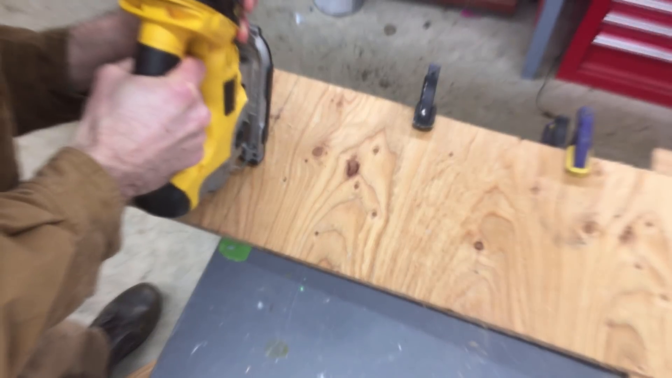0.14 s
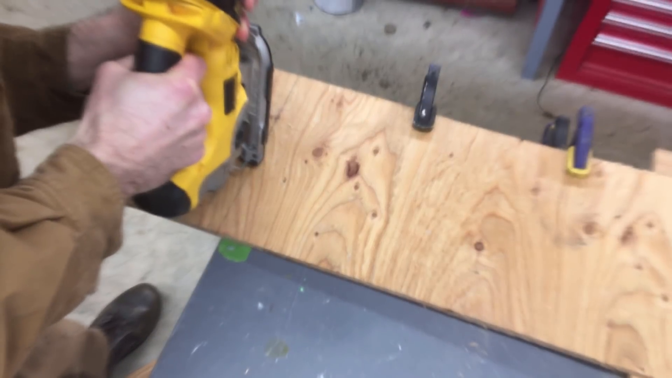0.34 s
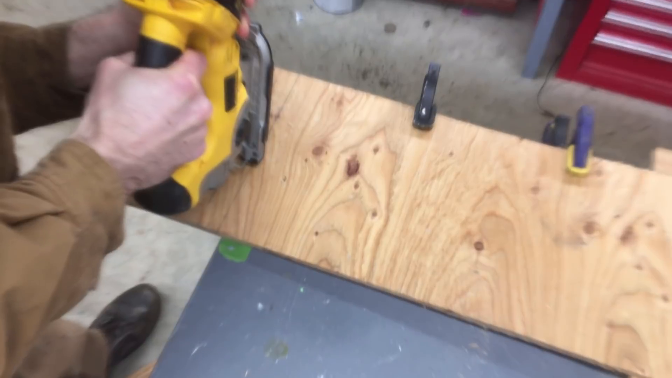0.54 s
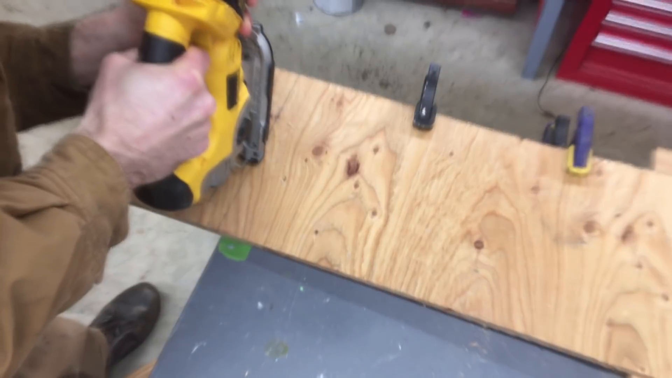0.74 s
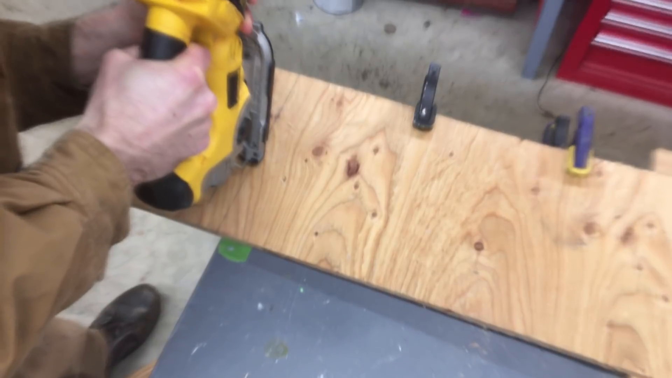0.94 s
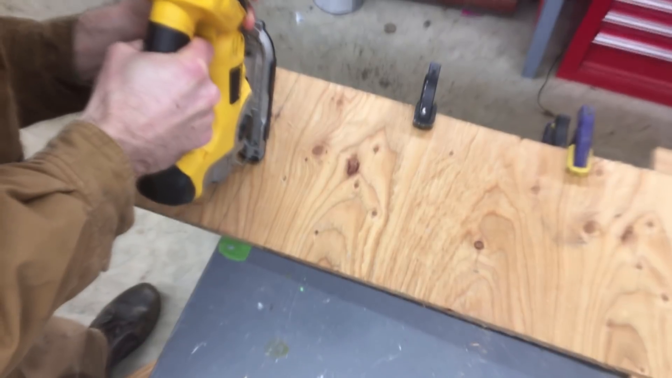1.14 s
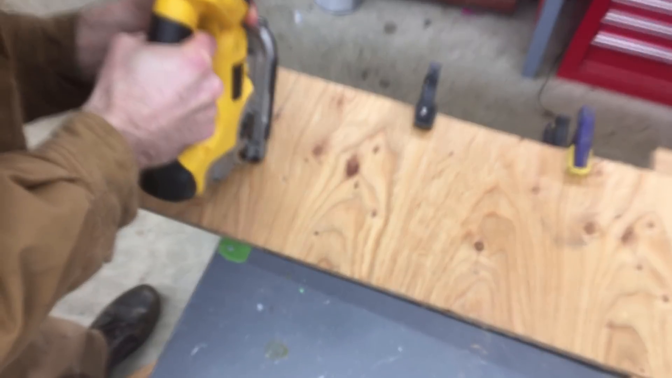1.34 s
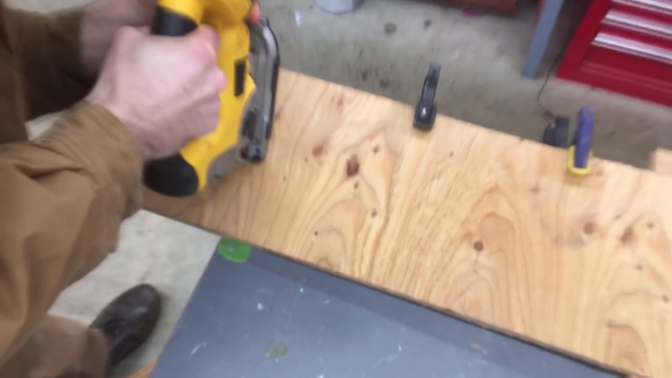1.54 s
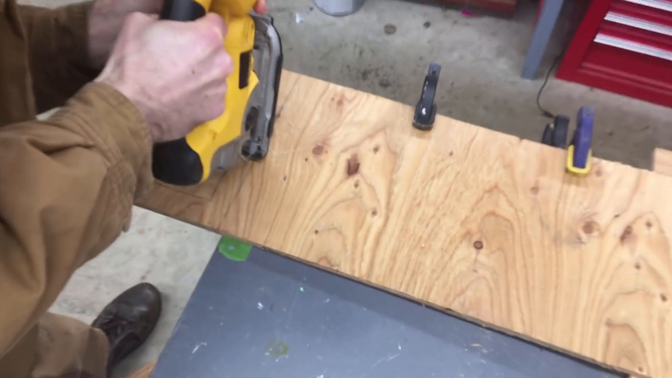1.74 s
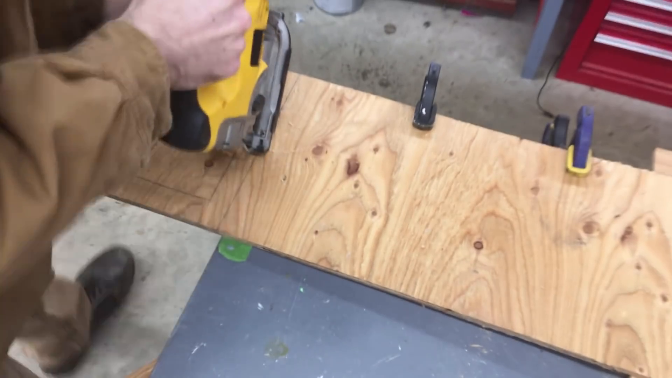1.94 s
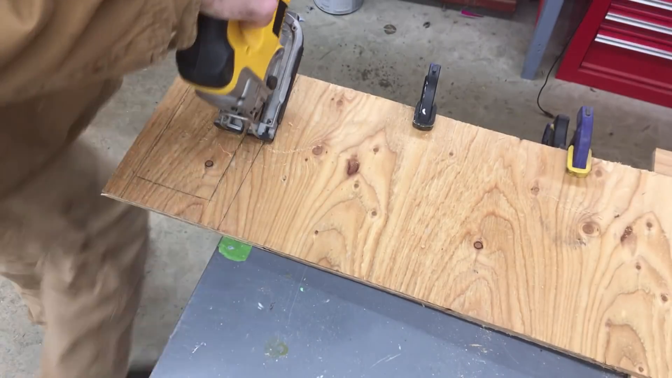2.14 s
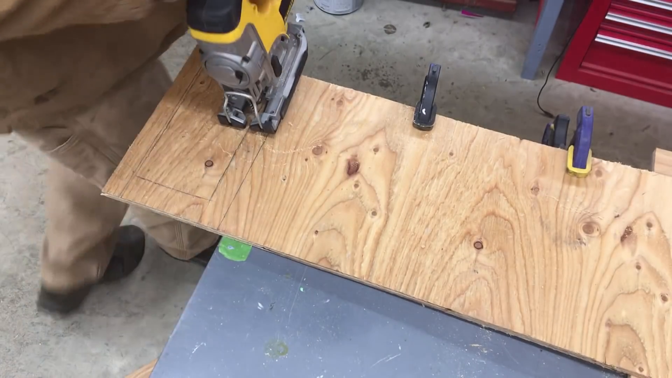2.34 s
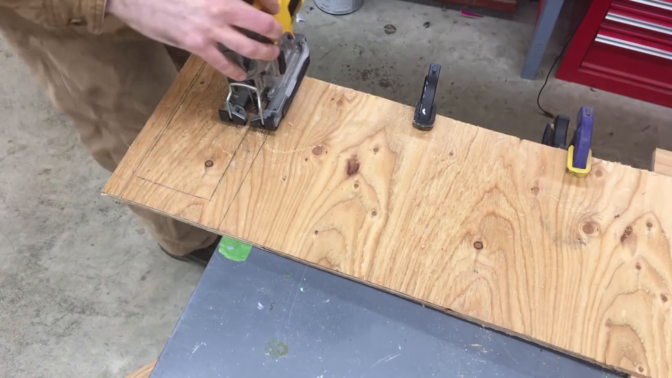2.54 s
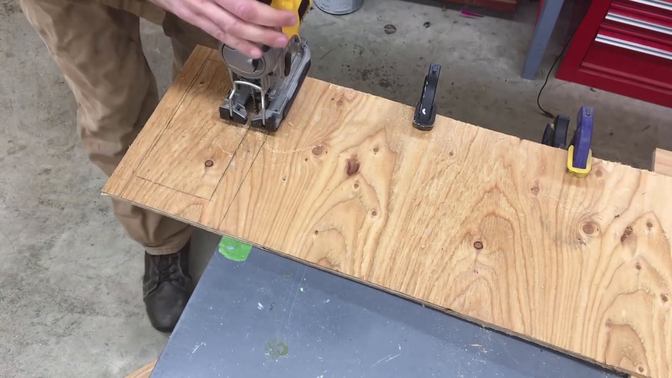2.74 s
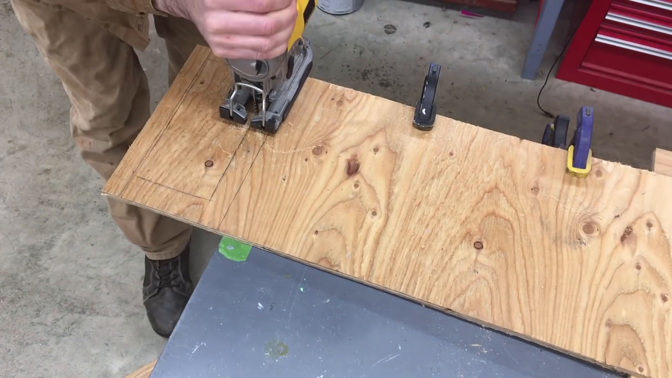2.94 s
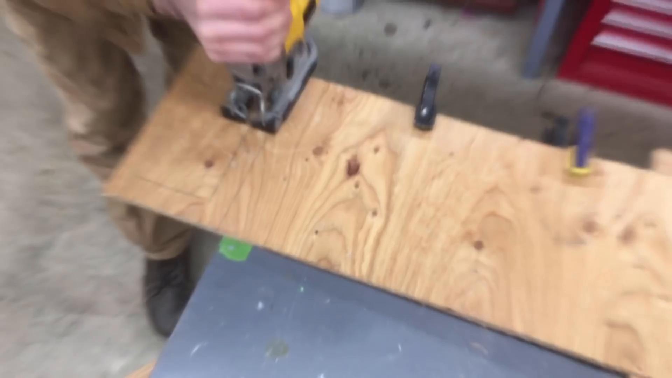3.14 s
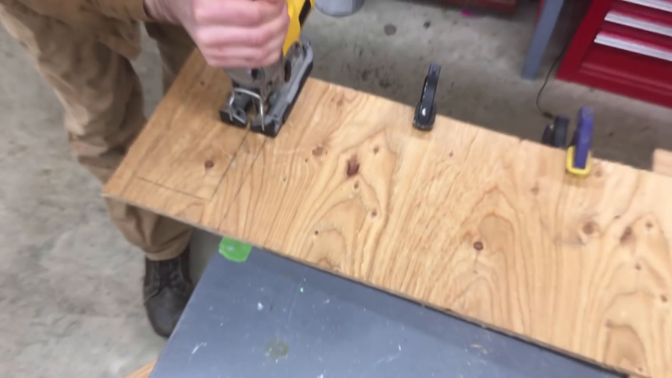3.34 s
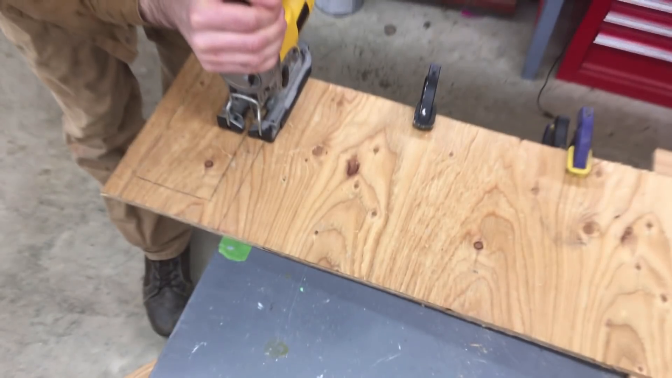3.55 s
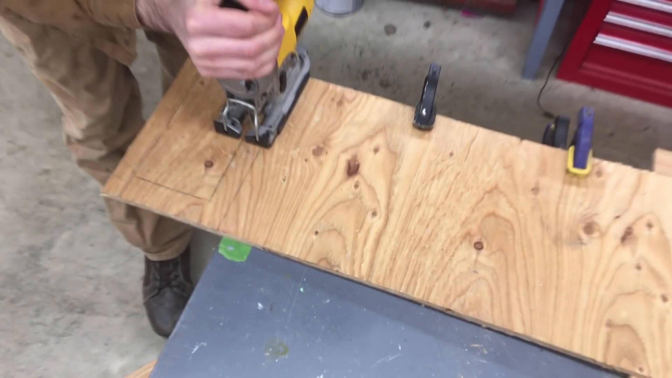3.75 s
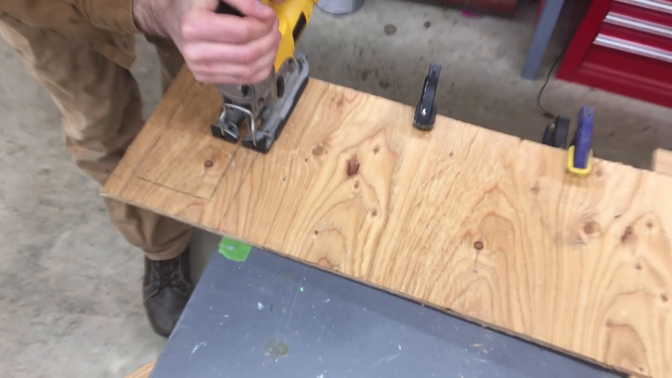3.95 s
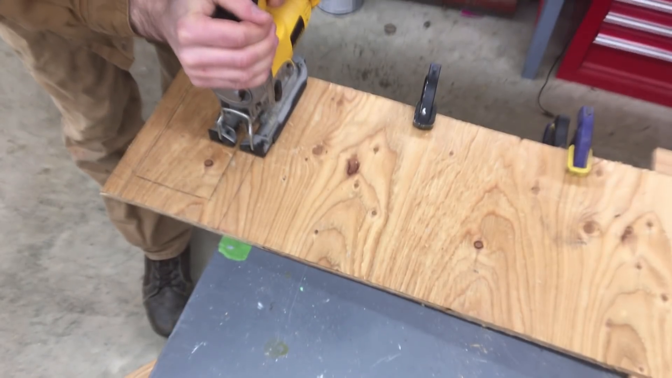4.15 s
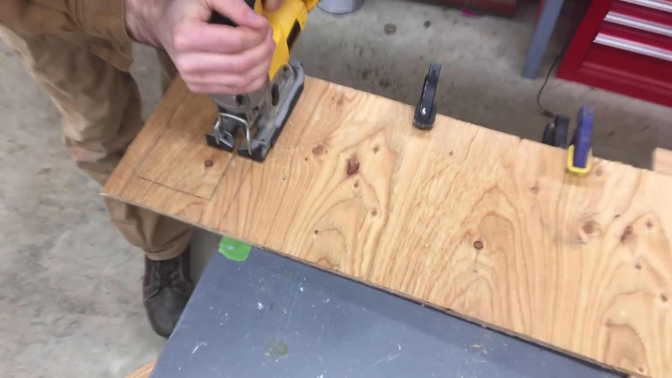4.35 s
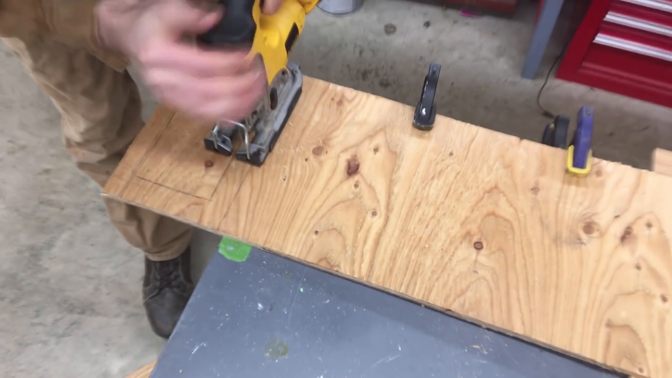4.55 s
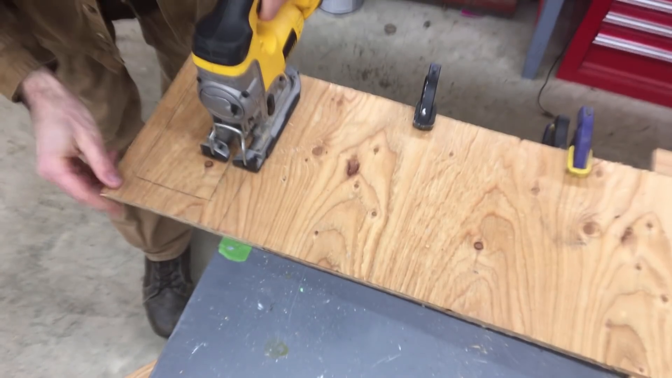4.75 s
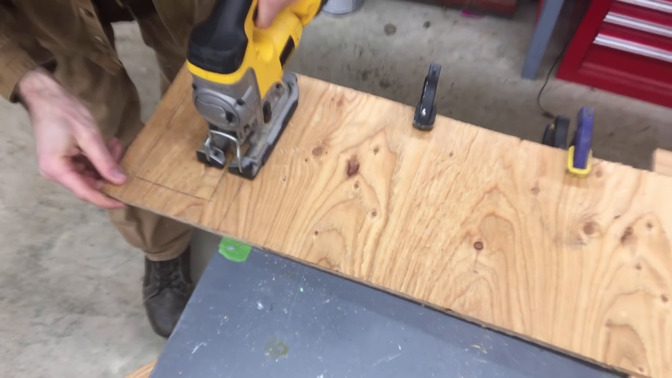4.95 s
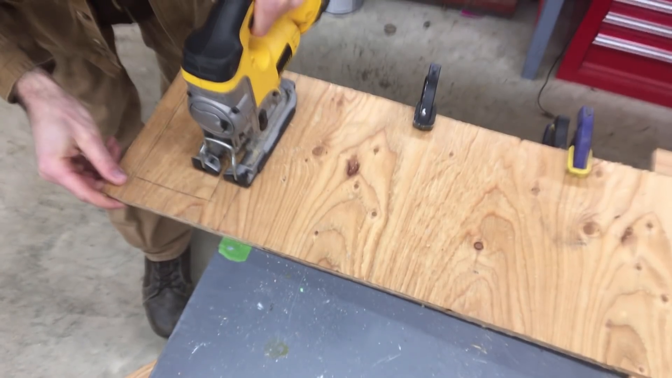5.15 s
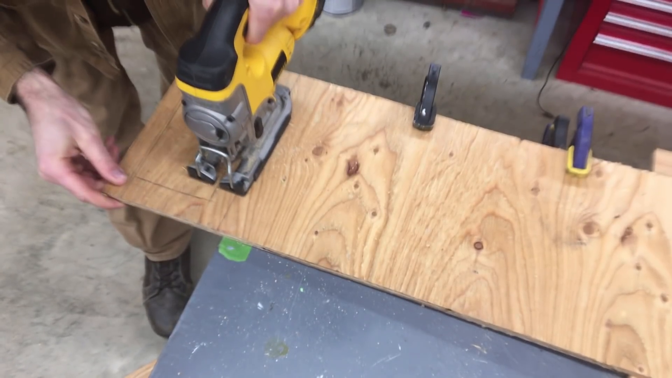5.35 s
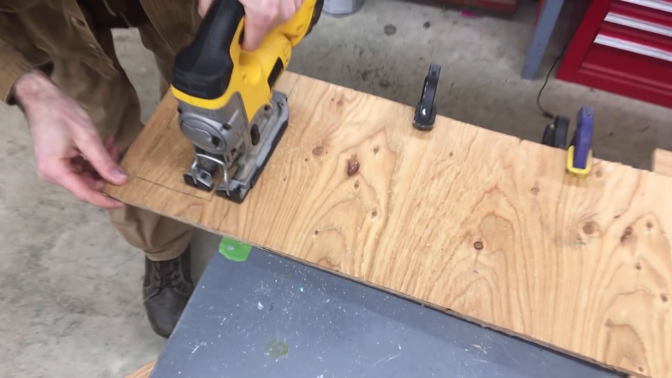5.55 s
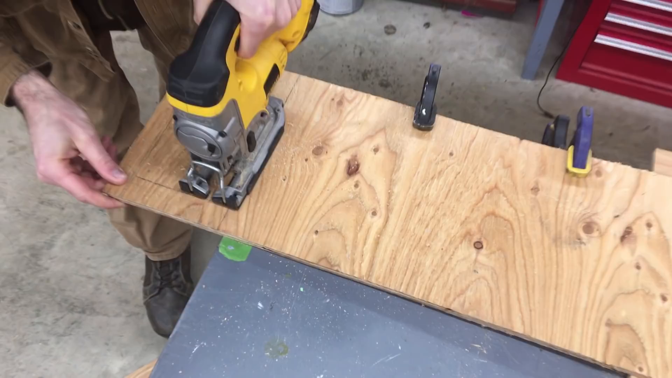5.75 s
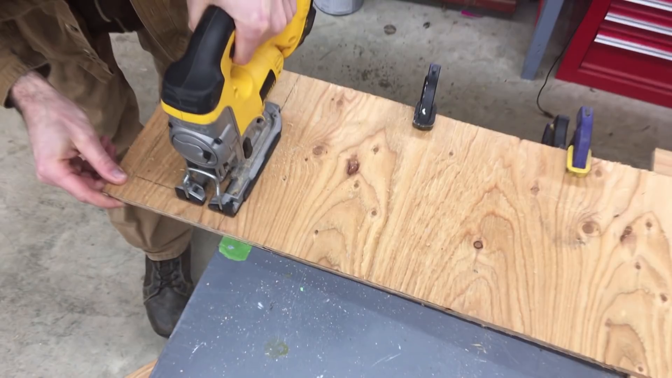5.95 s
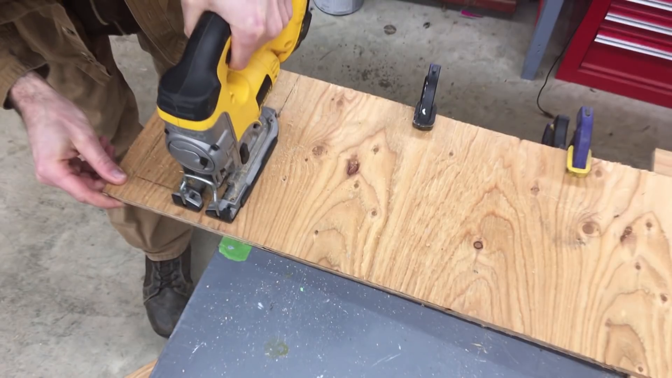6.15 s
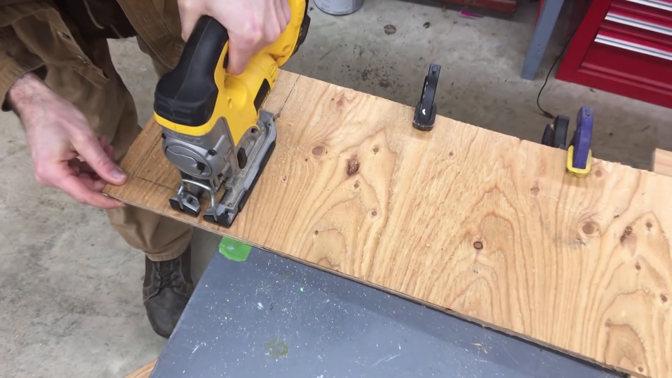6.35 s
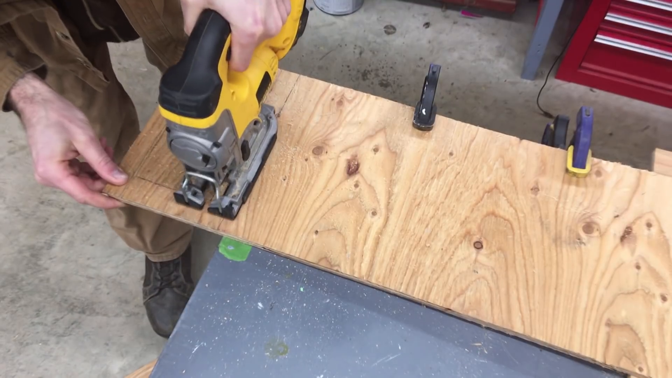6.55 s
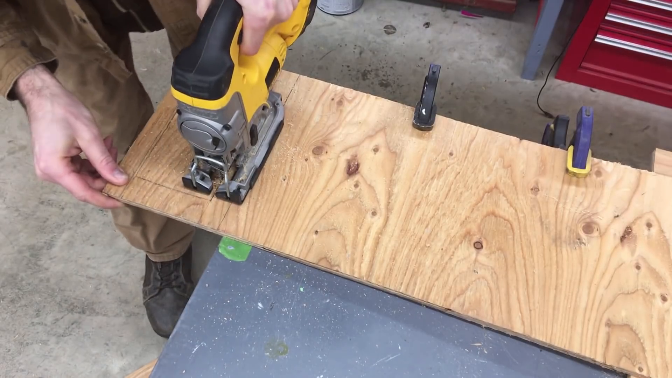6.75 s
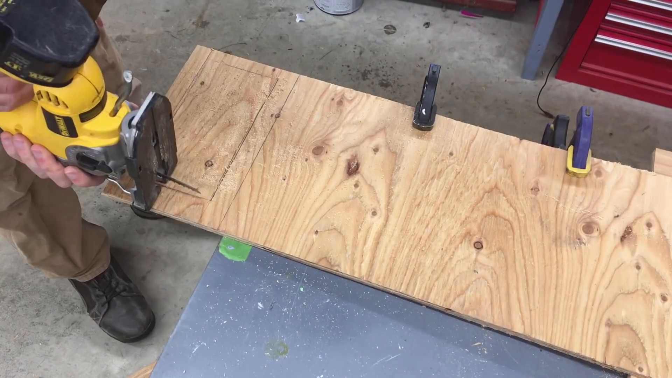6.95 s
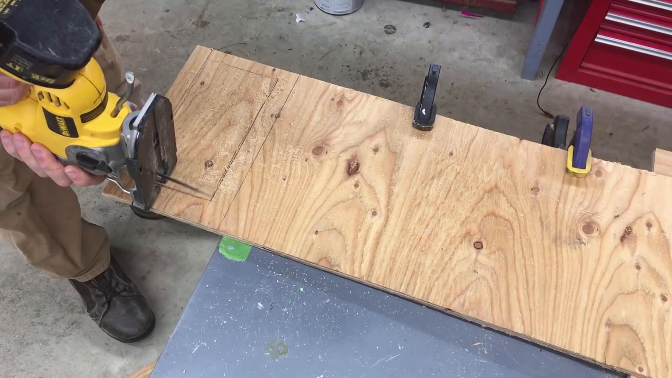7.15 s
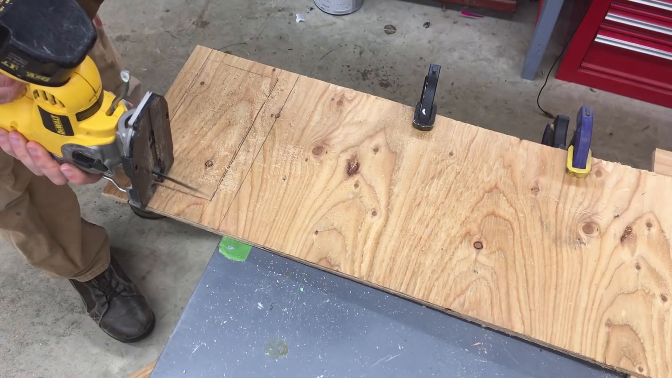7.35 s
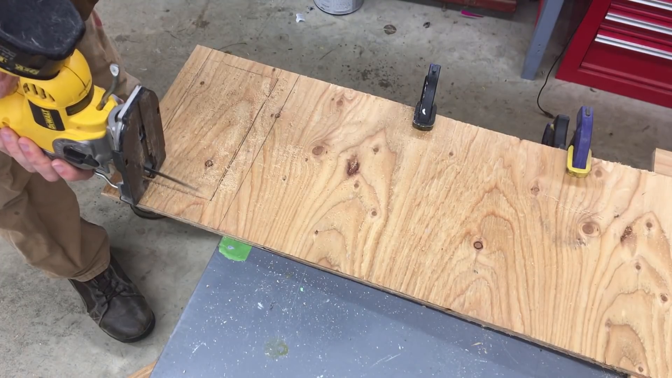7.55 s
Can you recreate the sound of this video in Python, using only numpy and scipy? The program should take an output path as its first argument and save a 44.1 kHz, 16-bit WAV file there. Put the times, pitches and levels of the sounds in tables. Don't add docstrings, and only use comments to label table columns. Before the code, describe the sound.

Two harsh, rattling jigsaw cuts in plywood, separated by soft rustles and knocks, end with a short lighter free-running buzz in a workshop.

```python
import sys
import numpy as np
from scipy import signal
from scipy.fft import rfft, irfft
from scipy.io import wavfile
from scipy.ndimage import uniform_filter1d

SR = 44100
rng = np.random.default_rng(int(sys.argv[2]) if len(sys.argv) > 2 else 0)


def waveform_to_disk(signal):
    frames = np.transpose(np.atleast_2d(signal))
    scaled = np.clip(frames, -1, 1) * 32767
    samples = np.round(scaled).astype(np.int16)
    wavfile.write(sys.argv[1], SR, samples)


def how_loud(loudness_db):
    steps = np.asarray(loudness_db, float) / 20
    return 10 ** steps


N = 335160
T = np.arange(N) / SR


def rms_one(x):
    return x / np.sqrt(np.mean(x ** 2) + 1e-20)


def smooth(x, size):
    return uniform_filter1d(np.asarray(x, float), size=size, axis=0, mode="nearest")


def even(x, size=9000):
    return x / np.sqrt(uniform_filter1d(x ** 2, size=size) + 1e-20)


def glide(table, t=T):
    s, *columns = np.transpose(table)
    return [np.interp(t, s, c) for c in columns]


def rows_at(table):
    table = np.array(table)
    return table[np.searchsorted(table[1:, 0], T), 1:]


def between(start, end):
    return (T > start) & (T < end)


def sounding(table):
    inside = (T >= table[0][0]) & (T <= table[-1][0])
    return how_loud(glide(table)[0]) * smooth(inside, 200)


def drift(rate):
    r = np.exp(-32 * np.pi * rate / SR)
    slow = signal.lfilter([1], [1, -2 * r, r * r], rng.standard_normal(N // 16 + 3002))[3000:]
    return np.interp(np.arange(N) / 16, np.arange(len(slow)), rms_one(slow))


def colour(x, points, rings=(), under_db=0):
    hz = np.arange(2049) * SR / 4096 + 1
    points_hz, points_db = np.transpose(points)
    power = how_loud(2 * (np.interp(np.log(hz), np.log(points_hz), points_db) + under_db))
    for centre_hz, width_hz, level_db in rings:
        power += how_loud(2 * level_db) / (1 + (2 * (hz - centre_hz) / width_hz) ** 2)
    cepstrum = irfft(.5 * np.log(power))
    cepstrum[1:2048] *= 2
    cepstrum[2049:] = 0
    return signal.fftconvolve(x, irfft(np.exp(rfft(cepstrum))))[:N]


def band(x, low_hz, high_hz):
    return signal.sosfilt(signal.butter(4, [low_hz, high_hz], "band", fs=SR, output="sos"), x)


def ring(clicks, hz, t60):
    r, w = how_loud(-60 / (t60 * SR)), 2 * np.pi * hz / SR
    return signal.lfilter([0, np.sin(w)], [1, -2 * r * np.cos(w), r * r], clicks + 1e-18)


def shop(x):
    t60_s = .42
    t = np.arange(SR) / SR
    low, high = rng.standard_normal((2, SR))
    tail = band(low, 60, 5000) * how_loud(-60 * t / t60_s)
    tail += band(high, 5000, 16500) * how_loud(-60 * t / (.7 * t60_s))
    tail *= np.clip((t - .004) / .015, 0, 1)
    return signal.fftconvolve(x, tail / np.sqrt(np.sum(tail ** 2)))[:N]


# middle t/s, half length/s, rustle level/dB, shuffle level/dB
MOVES = [
    (2.2, .12, -75, -71),
    (2.36, .06, -79, -88),
    (2.51, .08, -74, -73),
    (2.73, .1, -78, -83),
    (2.88, .07, -82, -79),
    (6.76, .08, -84, -80),
    (3.03, .03, -95, -84),
    (6.9, .035, -89, -82),
]
# f/Hz, level/dB per Hz
RUSTLE = [(410, -11), (700, -15), (1000, -2), (2370, -1), (2870, -5), (6690, -8), (13000, -13),
          (15500, -22)]
# f/Hz, level/dB per Hz
SHUFFLE = [(18, -75), (40, -12), (134, 6.5), (305, -6), (342, -10), (900, -24), (1170, -69), (1980, -120)]


def cloth_and_feet():
    rustle, shuffle = np.zeros((2, N))
    for middle, half, cloth_db, feet_db in MOVES:
        swell = np.exp(-((T - middle) / half) ** 2)
        rustle += how_loud(cloth_db) * swell
        shuffle += how_loud(feet_db) * swell
    grains = rng.standard_normal(N) * how_loud(3.5 * drift(30.))
    out = rustle * rms_one(colour(grains, RUSTLE))
    return out + shuffle * rms_one(colour(rng.standard_normal(N), SHUFFLE))


# t/s, peak level/dB, f/Hz
THUMPS = [(2.144, -63, 240), (2.214, -59, 190), (2.239, -63, 140), (2.329, -69, 145), (2.454, -64, 560),
          (2.47, -66, 160), (2.501, -62, 290), (2.529, -63, 480), (2.549, -65, 350), (2.635, -67, 300),
          (2.879, -68, 143), (3.075, -54, 200), (6.56, -52, 300), (6.63, -55, 290), (7.38, -58, 240)]


def thumps():
    out = np.zeros(N)
    contact = np.minimum(np.arange(3000) / (.004 * SR), 1)
    for s, db, hz in THUMPS:
        at = round(s * SR)
        out[at:at + 3000] += how_loud(db - 4) * ring(signal.unit_impulse(3000), hz, .07) * contact
    return out


# t/s, peak level/dB, ring f/Hz, thud level above it/dB
CLICKS = [(2.139, -60, 9000, -25), (2.211, -58, 3430, -18), (2.227, -61, 1250, -9),
          (2.254, -66, 10500, -20), (2.437, -66, 11000, -30), (2.418, -50, 4800, -34),
          (2.448, -60, 1700, -15), (2.5002, -69, 1340, -3), (2.578, -67, 3180, -19),
          (2.586, -57, 4960, -19), (2.623, -65, 2030, -11), (2.7252, -60, 2430, -25),
          (2.797, -60, 3490, -23), (2.8227, -68, 3560, -18), (2.853, -70, 3610, -18),
          (2.8744, -69, 1385, -14), (2.9602, -63, 1260, -13), (3.0475, -76.5, 1296, -20),
          (3.071, -70, 1400, 4), (6.578, -43, 900, -12), (6.662, -51, 2430, -19),
          (6.8049, -59.5, 3270, -29), (6.982, -73, 1500, -20), (6.991, -64, 8200, -30),
          (7.02, -70, 2200, 5), (7.045, -70, 1500, 8)]
# f/Hz, level/dB, t60/s
SHOE_MODES = [(2400, -11, .03), (3880, 7, .025), (4690, -17, 0.022), (6560, -3, 0.024)]


def clicks():
    out = np.zeros(N)
    hit = signal.unit_impulse(3000)
    since = np.arange(3000) / SR
    for s, db, hz, thud_db in CLICKS:
        noise = rng.standard_normal(3000)
        scuff = band(noise * np.exp(-since / .005), 1200, 11000)
        sound = .45 * ring(hit, hz, .018) + .6 * scuff
        for mode_hz, mode_db, t60 in SHOE_MODES:
            sound += how_loud(mode_db - 17.5 + rng.normal(0, 4)) * ring(hit, mode_hz, t60)
        thud = 6.9 * band(noise * np.exp(-since / .022), 100, 700)
        at = round(s * SR)
        out[at:at + 3000] += how_loud(db) * (band(sound, 700, 14000) + how_loud(thud_db) * thud)
    return out


# t/s, level/dB
WHINE = [(3.25, -65), (6.5, -54)]


def gear_whine(turns):
    return sounding(WHINE) * np.sin(2 * np.pi * (192.5 * turns + .5 * drift(60.)))


# from t/s, to t/s, f/Hz, level/dB
SQUEAL = [
    (6.7, 6.8, 8740, -78),
    (6.68, 6.9, 590, -82),
    (6.8, 6.91, 1160, -86),
]


def blade_squeal():
    rise_db_per_s, fall_db_per_s = 200, 400
    out = np.zeros(N)
    for start, end, hz, db in SQUEAL:
        level = db - rise_db_per_s * np.maximum(start - T, 0) - fall_db_per_s * np.maximum(T - end, 0)
        tone = np.sin(2 * np.pi * (hz * T + .2 * drift(50.)))
        out += np.sqrt(2) * how_loud(level + 2.5 * drift(30.)) * tone
    return out


# from t/s, level/dB on stroke orders 1, 3, 4, 7
GRIPS = [(0, -80, -65, -62, -60), (.15, -71, -67, -52, -62), (.68, -67, -55, -57, -60),
         (1.15, -65, -61, -51, -58), (1.665, -82, -70, -63, -74), (3.0, -78, -56, -60, -58),
         (3.2, -70, -48, -62, -58), (3.36, -63, -51, -60, -65), (3.6, -66, -56, -63, -64),
         (3.85, -70, -57, -65, -64), (4.25, -69, -57, -60, -63), (4.7, -72, -76, -60, -62),
         (5.5, -78, -80, -62, -59), (5.8, -77, -73, -59, -59), (6.1, -82, -78, -62, -55),
         (6.4, -79, -72, -70, -53), (6.98, -84, -78, -90, -72), (7.1, -80, -77, -90, -65),
         (7.4, -92, -80, -90, -61)]


def grip_heights(power, share):
    levels = smooth(rows_at(GRIPS), 3000).T
    return [power * share ** 3 * how_loud(db + 1.6 * drift(4.)) for db in levels]


OTHER_ORDERS = (2, 5, 6, 8, 9, 10, 11, 12, 13, 14)
# from t/s, level/dB of each
ORDER_DB = [(0, -16, -9, -2, -11, -12, -9, -7, -14, -4, -10),
            (.68, -12, -4, -15, -4, -15, -4, -10, -16, -10, -5),
            (1.15, -13, -5, -4, -3, -10, -3, -8, -3, -11, -3),
            (1.665, -28, -11, -7, -13, -13, -8, -18, -7, -18, -8),
            (3.0, -10, -7, -17, -20, -8, -14, -17, -3, -6, -3),
            (3.85, -12, -12, -14, -15, -7, -10, -18, -11, -8, -4),
            (4.7, -19, -17, -17, -18, -9, -12, -13, -8, -8, -7),
            (5.5, -29, -24, -22, -15, -7, -12, -15, -8, -9, -6),
            (6.05, -29, -27, -24, -19, -8, -8, -14, -2, -6, -8),
            (6.98, -28, -24, -10, -17, -8, -12, -3, -14, -18, -28),
            (7.4, -28, -28, -9, -22, -18, -22, -22, -22, -24, -28)]
# t/s, level/dB
SPIN_UP = [(7.04, -72), (7.065, -57), (7.13, -59), (7.3, -60), (7.6, -64)]


def board_shake(turns, heights, rumble, chatter):
    parts = list(zip((1, 3, 4, 7, 14), heights + [sounding(SPIN_UP)]))
    levels = smooth(how_loud(rows_at(ORDER_DB)), 900).T
    parts += [(k, rumble * level * how_loud(1.2 * drift(3.))) for k, level in zip(OTHER_ORDERS, levels)]
    out = np.zeros(N)
    for order, height in parts:
        waver = (.012 * np.sqrt(order) + .16 * chatter) * drift(25.)
        out += np.sqrt(2) * height * np.sin(2 * np.pi * (order * turns + rng.random() + waver))
    return out


# f/Hz, level/dB per Hz
RUMBLE = [(30, -46), (69, -10), (120, -4), (190, -7), (297, -2.5), (420, -8), (750, -4), (1000, -1),
          (1250, -25), (1980, -120)]


def sheet_rumble(drive):
    split_hz = 380
    shudder = how_loud(-2.5) * even(colour(.88 * drive + rng.standard_normal(N), RUMBLE))
    held_db = smooth(-7. * between(4.7, 6.35), 3000)
    return how_loud(held_db) * band(shudder, 25, split_hz) + band(shudder, split_hz, 2500)


# t/s, level above the tooth noise/dB, middle f/Hz, pitch spread/octaves
SLAPS = [(0, 1, 3300, .13), (.25, 4, 3100, .08), (.6, -2, 3300, .15), (1.2, -1, 2900, .18),
         (1.42, 4, 2800, .2), (1.62, 3, 2900, .22), (1.68, -4, 3700, .1), (1.9, 3, 3700, .1),
         (3.3, -3, 3600, .1), (3.55, 3, 3500, .12), (3.9, -1, 3500, .08), (4.15, 4, 3500, .04),
         (4.6, 2, 3500, .05), (5.05, 3, 3700, .13), (5.4, 3, 3900, .15), (5.8, 0, 3800, .15),
         (6.2, -5, 3800, .15), (7.6, -10, 3800, .1)]


def slaps(turns, rate):
    db, hz, spread = glide(SLAPS)
    stroke, place = turns.astype(int), turns % 1
    chance = rng.standard_normal((stroke[-1] + 1, 2, 3))
    out = np.zeros(N)
    for pitch, strength, late in chance[stroke].transpose(1, 2, 0):
        since = np.maximum((place - .05 - .02 * late) / rate, 0)
        swing = np.sin(2 * np.pi * hz * 2 ** (spread * pitch) * since)
        decay = how_loud(db + 1.6 * strength - 60 * since / .024)
        out += decay * swing * np.minimum(since / .001, 1)
    return out


# from t/s, to t/s, f/Hz, level/dB
FLARES = [(0, .16, 1640, -50), (0, .16, 3900, -47), (.07, .18, 2720, -52), (.13, .3, 3250, -53),
          (.227, .45, 1280, -47), (.3, .62, 1650, -48), (.42, .7, 1350, -47), (.636, .82, 1350, -44),
          (.62, .84, 1630, -49), (.674, .796, 2400, -52), (.68, .96, 3250, -51), (.76, 1.2, 1360, -44),
          (.93, 1.38, 1680, -55), (1.15, 1.4, 1372, -44), (1.4, 1.6, 1340, -46), (1.035, 1.134, 3840, -55),
          (1.24, 1.46, 3400, -52), (1.34, 1.62, 2450, -54), (1.64, 1.86, 4930, -52),
          (1.66, 1.94, 2050, -50), (1.68, 1.94, 1740, -51), (1.8, 1.94, 3950, -49),
          (3.101, 3.152, 1366, -39.5), (3.156, 3.225, 1330, -46), (3.386, 3.657, 4130, -39),
          (3.36, 3.66, 3480, -42), (3.426, 3.82, 1996, -46), (3.42, 3.77, 1700, -46),
          (3.66, 3.97, 4150, -46), (3.8, 4.0, 1980, -51), (4.2, 4.32, 1740, -49), (4.12, 4.62, 2440, -44),
          (3.95, 4.8, 3510, -45), (4.0, 4.62, 2120, -49), (4.495, 4.633, 1370, -49.5),
          (4.68, 5.12, 1950, -48), (4.99, 5.14, 4000, -41), (4.98, 5.3, 3280, -47), (5.18, 5.62, 4050, -41),
          (5.26, 5.5, 4500, -46), (5.2, 5.8, 6060, -48), (5.64, 5.78, 6060, -50), (5.8, 6.05, 5950, -51),
          (5.6, 5.8, 4250, -45), (5.84, 6.2, 4250, -48), (5.643, 6.06, 3450, -50), (5.66, 6.27, 1700, -46),
          (5.92, 6.3, 2150, -47), (6.183, 6.416, 2420, -46),
          (3.44, 3.74, 1400, -48), (3.82, 3.92, 5350, -50), (4.3, 4.62, 5000, -56),
               (4.75, 5.0, 3950, -50), (4.7, 5.15, 2400, -52), (5.35, 5.7, 3500, -51),
               (3.35, 3.62, 11300, -50), (4.0, 4.3, 11500, -53), (5.68, 5.93, 1380, -51),
               (6.3, 6.48, 1550, -48), (6.38, 6.64, 1250, -46), (6.54, 6.61, 900, -46),
               (7.035, 7.075, 1520, -47), (7.05, 7.22, 3800, -42), (7.17, 7.39, 3850, -41.5),
               (7.36, 7.6, 3800, -42), (4.6, 5.05, 6250, -52), (5.22, 5.4, 8730, -50), (.7, .98, 1050, -52),
               (1.42, 1.68, 1050, -51), (0, .24, 2150, -51), (3.4, 3.68, 3000, -48), (4.9, 5.3, 5200, -54),
               (4.62, 4.9, 1450, -49), (3.42, 3.7, 6200, -50), (5.3, 5.6, 4700, -50),
               (1.3, 1.64, 1950, -50), (3.8, 4.0, 1650, -52), (4.15, 4.6, 2600, -49)]
# f/Hz, width/Hz, share heard only as the teeth bite
FLARE_WIDTH = [(1300, 110, .35), (1900, 240, .2), (2420, 160, .2), (3500, 260, .8), (4150, 360, .5),
               (6200, 320, .6), (8700, 170, .8), (11500, 1100, .5)]


def flares(drive, bite):
    out = np.zeros(N)
    for start, end, hz, db in FLARES:
        width_hz, sharp = glide(FLARE_WIDTH, hz)
        a, b = round(start * SR), round(end * SR)
        gated = drive[a:b] * (1 - sharp + 2 * sharp * bite[a:b])
        peak = signal.iirpeak(hz, hz / width_hz / 1.3, fs=SR)
        rung = signal.lfilter(*peak, signal.lfilter(*peak, gated))
        out[a:b] += how_loud(db) * signal.windows.tukey(b - a, .5) * even(rung, size=1800)
    return out


def steady(x):
    edges = np.geomspace(600, 7200, num=19)
    out = np.sqrt(580) * even(band(x, 20, 600)) + np.sqrt(10800) * even(band(x, 7200, 18000))
    for a, b in zip(edges, edges[1:]):
        out += np.sqrt(b - a) * even(band(x, a, b), size=3500)
    return rms_one(out)


def teeth(turns, depth, back_share):
    stroke, place = turns.astype(int), turns % 1
    count = stroke[-1] + 1
    strength = how_loud(.8 * rng.standard_normal((count, 2)))[stroke]

    def burst(p):
        return np.clip(p / .08, 0, 1) * np.exp(-(np.maximum(p, 0) / .33) ** 2)

    gate = strength[:, 0] * burst(place) + back_share * strength[:, 1] * burst(place - .5)
    gate = 1 - depth + depth * 2.4 * gate
    pattern = signal.lfilter([1], [1, -.79], rng.standard_normal((count, 300)), axis=0)
    returning = steady(pattern[stroke, (place * 300).astype(int)])
    crackle = how_loud(.9 * np.minimum(rng.exponential(1, N), 6))
    grit = rms_one(rng.standard_normal(N) * crackle)
    low_pass = signal.butter(1, 3500, fs=SR, output="sos")
    return gate * (grit + signal.sosfilt(low_pass, .95 * returning - .55 * grit))


# t/s, depth 0-1
BITES = [(0, .3), (.5, .38), (1.6, .38), (1.7, .3), (3.3, .4), (4.6, .5), (5.5, .42), (5.85, .3),
         (6.15, .18), (6.9, .15), (7.0, .5), (7.6, .55)]


def bite_depth(load, rate, clear):
    depth = np.clip(glide(BITES)[0] + .02 * load, 0, 1)
    return depth * (1 - .7 * clear) * np.clip(rate / 74, 0, 1) ** 2


# f/Hz, width/Hz, level/dB
RINGS = [
    [(1270, 120, -4), (1620, 110, -4), (2420, 66, -15), (3290, 800, -8), (3830, 61, -6.5), (4930, 90, -11),
     (6434, 80, -10)],
    [(3400, 190, 0.5), (3900, 200, -1), (4940, 69, -13), (6210, 160, -8), (7530, 39, -5)],
    [(1725, 53, -10), (1980, 45, -19.5), (2430, 60, -7), (3496, 220, -2), (4120, 57, -3.5),
     (4950, 100, -15.5), (5310, 34, -10.5)],
    [(902, 140, -15), (1370, 70, -7), (1800, 500, -7), (2430, 60, -12), (3350, 300, -5), (5240, 32, -21.5)],
    [(1110, 21, -15), (2203, 63, -1), (3780, 330, -1), (4660, 100, -10.5), (6360, 140, -9), (8940, 730, -7)],
]
# f/Hz, level/dB per Hz
COLOURS = [
    [(410, -44), (700, -14), (1160, -13), (1360, 3), (1480, -4.5), (2200, -8), (3320, -10), (15500, -7.5)],
    [(410, -50), (700, -19), (1730, -1), (2430, -6), (3920, -5.5), (15500, -9.5)],
    [(410, -35.5), (760, -17), (1400, -7), (2050, -9), (2490, -5.5), (2800, -4.5), (3540, -8), (4700, -11),
     (15500, -14.5)],
    [(410, -30), (700, -17.5), (1130, -9), (1710, -10.5), (2770, -6.5), (4130, -4), (5000, -11),
     (7310, -13), (15500, -15)],
    [(410, -47), (800, -16), (3030, -3.5), (3770, -14), (5570, -12), (15500, -2)],
]


def body_rings(drive, stage):
    out = np.zeros(N)
    for k, (points, rings) in enumerate(zip(COLOURS, RINGS)):
        out += smooth(stage == k, 900) * rms_one(colour(drive, points, rings, under_db=-4.5))
    return out


# t/s, f/Hz (strokes)
SPEED = [(0, 79.6), (.8, 77.5), (1.1, 78.3), (1.4, 75.3), (1.63, 75.5), (1.75, 76.6), (3.2, 73.5),
         (3.35, 76.6), (3.6, 74), (3.85, 75.5), (4.4, 76.2), (4.73, 75.8), (5.03, 74.6), (5.83, 76),
         (5.98, 74.3), (6.43, 76.4), (6.59, 72.5), (6.99, 80.3)]
# t/s, full power t/s, creep level/dB, first f/Hz (strokes), spin-up/s
STARTS = [
    (-1, -.9, -10, 40, .08),
    (3.057, 3.11, -12, 40, .075),
    (6.991, 7.013, -20, 30, .076),
]
# t/s, brake/s, brake level/dB, coasting loss/dB per s, eased-off level/dB
STOPS = [
    (1.93, .04, -17, 70, 0),
    (6.59, .13, -24, 200, -6),
    (9, .1, -20, 100, 0),
]


def motor():
    onset_s, ease_s, coast_per_s2, slowest_per_s = .011, .23, 80, 30
    run = np.searchsorted(np.array(STARTS)[1:, 0], T)
    pull, full, creep_db, first, spin = np.array(STARTS)[run].T
    off, brake, brake_db, loss, ease_db = np.array(STOPS)[run].T
    top = glide(SPEED, np.minimum(T, off))[0]
    since = np.maximum(T - off, 0)
    rate = top - (top - first) * np.exp(-((T - pull) / spin) ** 2.2) - coast_per_s2 * since
    rate = np.maximum(rate, slowest_per_s)
    creeping = T < full
    db = creep_db * creeping * (1 - .4 * (T - pull) / (full - pull))
    db += ease_db * np.clip(1 + (T - off) / ease_s, 0, 1)
    db += brake_db * np.minimum(since / brake, 1) - loss * np.maximum(since - brake, 0)
    share = np.where(since > 0, 1, np.minimum(rate / top, 1))
    gain = smooth(how_loud(db) * np.minimum((T - pull) / onset_s, 1) ** 2, 100)
    return rate, share, creeping, gain


# t/s, level/dB
LOAD = [(0, -42.5), (.2, -46), (.4, -42), (.64, -43.5), (.72, -40.5), (.89, -43), (1.4, -40), (1.66, -46),
        (1.84, -41.5), (3.16, -39.5), (3.25, -44.5), (3.52, -38), (3.82, -41.5), (5.28, -45.5),
        (6.05, -41.5), (6.4, -44.5), (7.05, -49), (7.6, -55)]
# from t/s, share of return stroke 0-1, shoe, gear hiss and rumble level/dB
STAGES = [
    (0, .17, -41.3, -41.8, -58),
    (1.665, .1, -41.5, -43.5, -59.5),
    (2.7, .3, -42, -42.5, -57),
    (4.7, .16, -42.2, -42, -55.5),
    (6.98, .72, -41.5, -40, -65),
]
# from t/s, to t/s, looseness 0-2
CHATTER = [
    (1.66, 2.4, .3),
    (3.0, 3.23, 2),
    (6.465, 6.95, 2),
    (6.95, 7.14, .4),
    (7.14, 7.6, .3),
]


def saw():
    usual_load_db = -42.5
    rate, share, creeping, power = motor()
    turns = np.cumsum(rate) / SR + .22
    load = glide(LOAD)[0] - usual_load_db
    clear = smooth(between(3.0, 3.4), 3000)
    chatter = smooth(sum(loose * ((T >= a) & (T < b)) for a, b, loose in CHATTER), 3000)
    stage = np.searchsorted(np.array(STAGES)[1:, 0], T)
    back, shoe_db, gear_db, rumble_db = smooth(rows_at(STAGES), 900).T

    board = power * how_loud(usual_load_db + load)
    shoe = power * how_loud(shoe_db + .3 * load) * share ** .8
    gear = power ** 1.12 * how_loud(gear_db - 2 * creeping + .15 * load) * share ** 1.4
    lingering = power ** .75
    rumble = lingering * how_loud(rumble_db + 4 * clear + .3 * load + 2.5 * chatter) * share ** 3

    drive = teeth(turns, bite_depth(load, rate, clear), back)
    body = body_rings(drive, stage)
    bite = np.exp(-(turns % 1 / .3) ** 2)
    body += how_loud(38.5) * flares(np.roll(drive, round(SR / 76)), bite)
    body += slaps(turns, rate) * np.clip(rate / 74, 0, 1) ** 4

    out = board * even(band(body, 750, 2200))
    out += shoe * even(band(body, 2200, 5200))
    out += gear * even(band(body, 5200, 18000))
    out += rumble * sheet_rumble(drive)
    out += board_shake(turns, grip_heights(lingering, share), rumble, chatter)
    return out + blade_squeal() + gear_whine(turns)


def scene():
    dry = saw() + clicks() + thumps() + cloth_and_feet()
    floor = how_loud(-103) * band(rng.standard_normal(N), 40, 9000)
    return (dry + how_loud(-13) * shop(dry) + floor)[None]


def top_cut(x):
    return signal.sosfilt(signal.butter(12, 16880, fs=SR, output="sos"), x)


def record(dry):
    rounded = .13 * np.tanh(dry / .13)
    cut = signal.sosfilt(signal.ellip(12, .2, 70, 15740, fs=SR, output="sos"), rounded)
    mix = signal.sosfilt(signal.butter(2, 62, "high", fs=SR, output="sos"), cut)
    return top_cut(mix)


dry = scene()
out = record(dry)
waveform_to_disk(out)
```